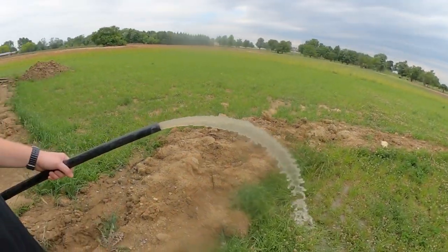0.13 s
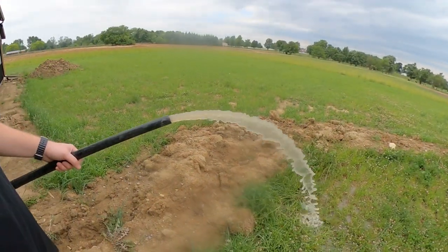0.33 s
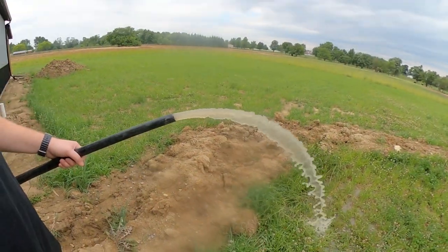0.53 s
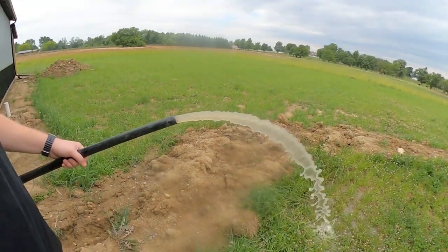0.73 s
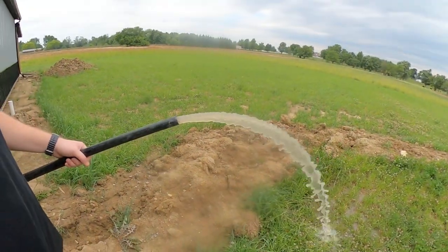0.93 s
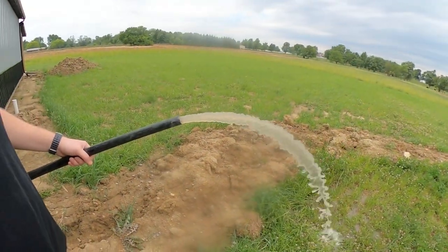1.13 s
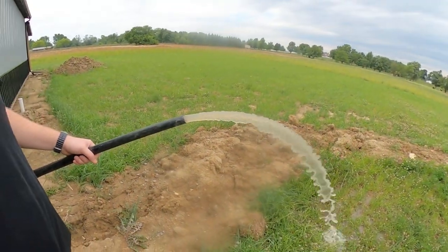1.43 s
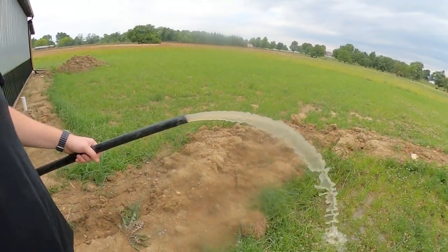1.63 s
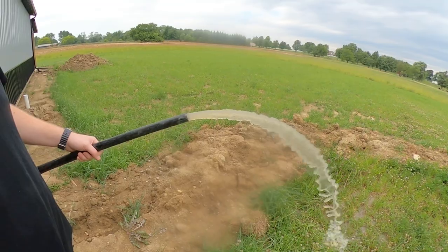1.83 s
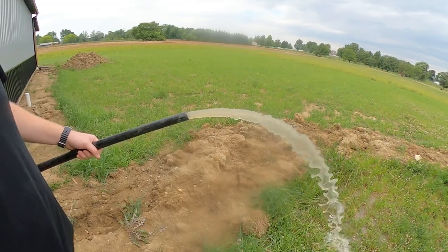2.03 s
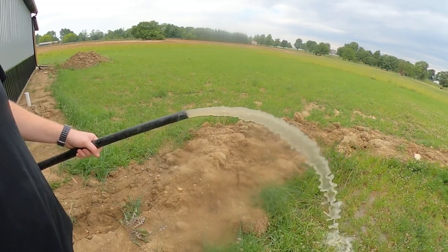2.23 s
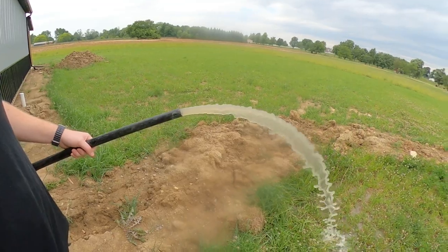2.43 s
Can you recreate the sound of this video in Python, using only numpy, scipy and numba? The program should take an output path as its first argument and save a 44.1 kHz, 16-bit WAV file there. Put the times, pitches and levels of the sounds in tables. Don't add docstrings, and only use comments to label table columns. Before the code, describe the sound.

Water pours steadily onto grass and soil for about 2.6 seconds, already running at the start and never stopping: rapid irregular slaps, short bubbly plops, crisp spray hiss. It sounds fuller around 0.5-0.9 s, thinner after 1.4 s. Low wind thumps hit the close outdoor microphone from 0.35 to 1.2 s, hardest and ragged near 0.82 s, uneven left and right; then nearly mono, with a faint gust around 2.25 s.

```python
import sys
import numpy as np
from scipy import signal
from scipy.fft import rfft, irfft
from scipy.io import wavfile
from scipy.ndimage import uniform_filter1d
from numba import njit

SR = 44100
rng = np.random.default_rng(int(sys.argv[2]) if len(sys.argv) > 2 else 0)


def voltage_ratio(level):
    return 10 ** (np.asarray(level, float) / 20)


def store_wav(level_fs):
    pcm = np.round(np.clip(np.atleast_2d(level_fs), -1, 1) * 32767)
    wavfile.write(sys.argv[1], SR, pcm.T.astype(np.int16))


N = 114660


def level(x, db):
    return x * voltage_ratio(db) / np.sqrt(np.mean(x ** 2))


def curve(table, axis):
    rows = np.array(table)
    return np.interp(np.arange(N) / SR, rows[:, 0], rows[:, axis])


def along(table, hz):
    rows = np.array(table)
    return np.interp(np.log(np.maximum(hz, 1)), np.log(rows[:, 0]), rows[:, 1])


def colour(x, db_at):
    return irfft(rfft(x) * voltage_ratio(db_at(np.fft.rfftfreq(N, 1 / SR))), N)


def band(x, lo_hz, hi_hz):
    return signal.sosfilt(signal.butter(2, [lo_hz, hi_hz], "band", fs=SR, output="sos"), x)


def tilt(x, hz, slope):
    return colour(x, lambda f: -10 * np.log10(1 + (np.maximum(f, 1) / hz) ** slope))


def steady(x, span_s):
    k = int(span_s * SR)
    power = uniform_filter1d(uniform_filter1d(x ** 2, k), k)
    return x / np.sqrt(power + 1e-18)


def walk(rate):
    k = int(SR / rate)
    steps = np.repeat(rng.standard_normal(N // k + 1), k)
    return 1.42 * uniform_filter1d(uniform_filter1d(steps, k), k)[:N]


def flicker(rate):
    w = walk(rate)
    return w - uniform_filter1d(w, int(.12 * SR))


@njit
def grains(n, start, pole, glide, size, length):
    y = np.zeros(n)
    for k in range(len(start)):
        z, p = size[k] + 0j, pole[k]
        for i in range(start[k], min(n, start[k] + length[k])):
            y[i] += z.imag
            z *= p
            p *= glide[k]
    return y


def rings(at_s, hz, cycles, size, rise):
    length = cycles * SR / hz
    turn = 2j * np.pi * hz / SR
    pole = np.exp(turn - np.log(1000) / length)
    glide = np.exp(turn * rise / length)
    return grains(N, (at_s * SR).astype(np.int64), pole, glide, size, length.astype(np.int64))


def bursts(at_s, size, t60_s, attack_s):
    spikes = np.zeros(N)
    np.add.at(spikes, np.clip((at_s * SR).astype(int), 0, N - 1), size ** 2)
    fall = np.exp(-2 * np.log(1000) / (t60_s * SR))
    rise = np.exp(-1 / (attack_s * SR))
    dying = signal.lfilter([1], [1, -fall], spikes)
    return np.sqrt(np.abs(signal.lfilter([1 - rise], [1, -rise], dying)))


def landing(slaps):
    lumps_per_s, spread_db, lull_lead_s, lull_share = 55, 6.5, 0.0128, 0.46
    chance = rng.random((int(lumps_per_s * N / SR), 2))
    at_s = (np.arange(len(chance)) + 1.13 * chance[:, 0]) / lumps_per_s
    small = level(bursts(at_s, voltage_ratio(spread_db * chance[:, 1]), 0.035, 0.0038), 0)
    big = bursts(slaps[:, 0], voltage_ratio(slaps[:, 1] + 40), 0.045, 0.0018)
    gap = bursts(slaps[:, 0], np.ones(len(slaps)), 0.025, 0.0013)
    gap = np.clip(np.roll(gap, -int(lull_lead_s * SR)), 0, 1)
    lull = 1 - lull_share * gap * np.clip(1 - 3 * big, 0, 1)
    return 0.69 * small * lull + 0.58 * big, big, lull


def bubbles(per_s, lo_hz, span, cycles, spread_db, lumps):
    chance = rng.random((int(per_s * N / SR), 4))
    hz = lo_hz * span ** chance[:, 1]
    size = voltage_ratio(-spread_db * np.log(chance[:, 2] + 0.054)) * np.sqrt(hz)
    size = size * lumps[(chance[:, 0] * N).astype(int)]
    return level(rings(chance[:, 0] * N / SR, hz, cycles * (1 + 2.1 * chance[:, 3]), size, 0.071), 0)


def fine_spray(lumps):
    surge_db, surges_per_s = 1.3, 40
    mist = np.zeros(N)
    for hz in 400 * 2 ** np.arange(6):
        octave = colour(rng.standard_normal(N), lambda f: -9 * np.log2((f + 1) / hz) ** 2)
        mist += octave * voltage_ratio(1.8 * flicker(25))
    drops = bubbles(1500, 1334, 13.2, 54, 3, lumps + .5)
    return voltage_ratio(surge_db * flicker(surges_per_s)) * (voltage_ratio(2) * mist + voltage_ratio(-2) * drops)


def slap_noise(lumps, big):
    hit = voltage_ratio(-2) * lumps + voltage_ratio(-3) * big
    dull = tilt(hit * rng.standard_normal(N), 1230, 4.9)
    return dull + voltage_ratio(-7.5) * hit * rng.standard_normal(N)


def splash_db(hz):
    # (frequency [Hz], level [dB])
    broad = [(200, -9.5), (380, -10), (600, -5.5), (1500, -3), (4500, -3), (8000, -16), (12500, -33.5),
             (15500, -39.5)]
    # (frequency [Hz], width [Hz], level [dB])
    puddle = [(536, 330, -0.5), (694, 37, 3.5), (834, 61, 7.5), (1006, 300, -1.5), (1230, 107, 4.5),
              (1500, 89, 2.5), (2110, 75, -2.5), (2360, 21, 3), (3034, 65, 4.5), (3460, 390, -0.5),
              (4930, 91, 1.5), (6060, 67, 4), (8660, 510, 0), (12200, 1700, 3)]
    return along(broad, hz) + sum(db * np.exp(-2 * ((hz - f) / w) ** 2) for f, w, db in puddle)


def fling_envelope():
    # (time [s], level [dB])
    thrown = np.array([
        (0.853, 5.5),
        (1.218, 3),
        (2.307, -5),
        (.178, 1),
        (0.39, -11),
        (.455, 6),
        (0.544, 5),
        (.575, -18),
        (1.028, -25),
    ])
    return bursts(thrown[:, 0], voltage_ratio(thrown[:, 1]), 0.076, 0.00083)


def slap_rings(slaps):
    cycles = np.full(len(slaps), 20.5)
    ring = rings(slaps[:, 0] + 0.00163, slaps[:, 2], cycles, voltage_ratio(slaps[:, 1] - 5.5), 0.021)
    return band(ring, 440, 2850)


def soil_thud(lumps):
    hz, width_hz = 170.5, 84
    thud = band(rng.standard_normal(N) * (lumps + 0.36), hz - width_hz / 2, hz + width_hz / 2)
    return level(band(thud, hz / 1.94, hz * 2.0), -56)


def water():
    # (time [s], peak [dB], ring [Hz])
    main_slaps = [(0.035, -27.5, 750), (0.054, -39, 1150), (0.067, -28.5, 1230), (0.095, -24.5, 1220),
                  (0.123, -34, 720), (0.177, -38, 790), (0.202, -28, 820), (0.23, -31, 1670),
                  (0.244, -33, 820), (0.263, -32.5, 799), (0.281, -31.5, 1000), (0.382, -24.5, 1760),
                  (0.415, -30.5, 1100), (0.439, -22.5, 1230), (0.493, -30.5, 1100), (0.517, -24.5, 1150),
                  (0.569, -27, 810), (0.599, -42, 830), (0.618, -26, 830), (0.796, -39, 680),
                  (0.885, -41, 860), (0.908, -26, 840), (0.938, -28, 821), (1.018, -29.5, 810),
                  (1.054, -31, 815), (1.105, -36, 696), (1.129, -30, 860), (1.156, -34.5, 1440),
                  (1.171, -26.5, 1460), (1.231, -29, 1500), (1.311, -32.5, 826), (1.349, -30.5, 1470),
                  (1.462, -28.5, 1540), (1.495, -29.5, 1560), (1.527, -33.5, 1920), (1.575, -28.5, 834),
                  (1.634, -27.5, 1470), (1.679, -33, 845), (1.713, -28.5, 791), (1.772, -33, 861),
                  (1.817, -26.5, 1480), (1.838, -38, 850), (1.863, -34, 1770), (1.911, -41, 1510),
                  (1.967, -28, 1610), (2.002, -39, 830), (2.017, -27.5, 1380), (2.045, -27.5, 830),
                  (2.1, -30, 1470), (2.203, -39.5, 826), (2.228, -32, 726), (2.261, -30, 810),
                  (2.304, -30.5, 1450), (2.355, -30.5, 820), (2.424, -40, 1130), (2.446, -24, 1480),
                  (2.493, -29, 1340), (2.53, -27.5, 1090)]
    # (time [s], peak [dB], ring [Hz])
    more_slaps = [(0.456, -28, 590), (0.474, -30, 807), (0.636, -32, 818), (0.682, -30.5, 800),
                  (0.707, -34, 695), (0.952, -31.5, 681), (1.752, -37, 850), (1.792, -32, 1380),
                  (2.059, -29, 970), (2.369, -32, 845), (2.548, -42, 1600), (2.549, -28.5, 844)]
    # (time [s], flow [dB], body as it lands on soil [dB], sparkle as the camera turns [dB])
    flow = [
        (0, -47, 4, 5.5),
        (.3, -48, 4, 9),
        (.55, -49, 8, 9),
        (.85, -47.5, 2.5, 6),
        (1.0, -48, 3, 4.5),
        (1.4, -46, -4, 1.5),
        (1.7, -45.5, -4, 4),
        (2.2, -46, -2.5, 6),
        (2.6, -44, -6, 5),
    ]
    slaps = np.concatenate([np.array(main_slaps), np.array(more_slaps)])
    lumps, big, lull = landing(slaps)
    fine = lull * fine_spray(lumps)
    spatter = voltage_ratio(-4.5) * bubbles(780, 5880, 3.8, 6.6, 2.4, lumps + 0.11)
    plops = voltage_ratio(-3) * bubbles(420, 483.6, 4.83, 9.5, 2, lumps + 0.54)
    splash = colour(fine + spatter + slap_noise(lumps, big) + plops, splash_db)
    splash = splash / np.std(band(splash, 2000, 6000))
    body = tilt(splash, 1120, 2.96)
    bright = splash - body
    splash = steady(bright, 0.064) * np.std(bright)
    splash = splash + voltage_ratio(curve(flow, axis=2)) * steady(body, 0.12) * np.std(body)
    splash = splash + tilt(splash, 6200, -1) * fling_envelope()
    sparkle = voltage_ratio(curve(flow, axis=3) / 3) - 1
    for hz in (7500, 10000, 11500):
        splash = splash + sparkle * tilt(splash, hz, -6)
    return splash * voltage_ratio(curve(flow, axis=1)) + slap_rings(slaps) + soil_thud(lumps)


def wind():
    # (time [s], level [dB], sharpness [dB])
    gusts = [(0, -53.5, -6), (.28, -51, -21.5), (.42, -32.5, -30.5), (.55, -43.5, -18.5), (.65, -34, -18),
             (.77, -43.5, -6), (.83, -34.5, -18), (.88, -40.5, -1), (.94, -31, -14), (1.05, -39.5, -13),
             (1.12, -40.5, -19.5), (1.27, -44, -12), (1.47, -43.5, -48), (1.56, -58, -11.5),
             (1.9, -62, -18), (2.2, -48.5, -13), (2.27, -41.5, -13), (2.6, -55.5, -37)]
    # (frequency [Hz], level [dB])
    rumble = [(15, -7.5), (38, 1), (65, -12.5), (110, -10.5), (170, -15), (260, -25.5), (400, -36.5),
              (1200, -110)]
    # (frequency [Hz], correlation [0-1])
    likeness = [(25, .9), (60, .65), (125, .5), (250, .3), (600, .1)]
    deep_parts, sharp_parts = [], []
    for sign in (1, -1):
        def port_db(f):
            alike = np.clip(along(likeness, f), 0, .99)
            return along(rumble, f) + 10 * np.log10((1 + sign * alike) / 2)
        x = colour(rng.standard_normal(N), port_db)
        deep = tilt_deep = colour(x, lambda f: -10 * np.log10(1 + (f / 110) ** 4))
        deep_parts.append(steady(deep, 0.02) * np.std(deep) * voltage_ratio(0.89 * walk(12.4)))
        sharp_parts.append((x - deep) * voltage_ratio(8.6 * walk(35.3) + curve(gusts, axis=2) + 11.0))
    both = np.array(deep_parts) + np.array(sharp_parts)
    return both / np.std(deep_parts[0]) * voltage_ratio(curve(gusts, axis=1) + 3.0) + buffets()


def buffets():
    # (time [s], peak [dB], pitch [Hz], left-right share [-1 to 1])
    eddies = [(.34, -30.5, 30, 0), (.37, -28.5, 45, 0), (0.392, -29, 60.6, 0.11), (0.425, -21, 51, 0.38),
              (0.463, -22.5, 70.4, -0.62), (0.481, -28, 49.8, 0), (0.522, -30.5, 40.3, 0.074),
              (0.591, -23, 90, 0.39), (0.604, -28, 60, -0.12), (0.649, -20.5, 73, 0.16),
              (0.674, -25, 70, -0.26), (.75, -25.5, 60, 0.78), (0.803, -23, 79, -0.38),
              (0.8206, -12.5, 145.5, -0.74), (0.83, -18, 51.5, .4), (.852, -21.5, 54.7, 0.34),
              (0.872, -27, 60, -0.068), (0.903, -22.5, 39.8, 0.1), (0.926, -17.5, 50.6, 0.077),
              (0.95, -27, 75.4, -0.12), (.958, -26, 84, -0.18), (0.996, -25, 69, -0.31),
              (1.023, -33, 260, 0), (1.1, -25, 75, -0.039), (1.123, -27, 40, 0.15),
              (1.163, -33.5, 112, -0.074), (1.196, -27.5, 110, -0.0042), (1.206, -25.5, 108, -0.092),
              (2.234, -30, 121, 0), (2.261, -29, 45, 0), (2.292, -33, 59, 0), (2.33, -41, 45, 0)]
    rag_db, rag_above_db = -34.5, -20.5
    t, out = np.arange(N) / SR, np.zeros((2, N))
    rag = [level(band(band(rng.standard_normal(N), 280, 520), 220, 1000), rag_db) for _ in range(2)]
    rag = np.array(rag) * [[.6], [1]]
    for at, db, hz, share in eddies:
        u = (t - at) * hz
        mid = -np.cos(2 * np.pi * u - .4)
        side = share * np.sin(2.6 * np.pi * u + 0.18)
        out += voltage_ratio(db) * np.exp(-(u / 0.48) ** 2) * np.array([mid, side])
        out += voltage_ratio(2 * db - rag_above_db) * np.exp(-((t - at - .006) / 0.013) ** 2) * rag
    return out


def far_rumble():
    return level(band(rng.standard_normal(N) * (1 + np.arange(N) / SR), 26, 47), -60.5)


def treble_width(jet):
    centre_hz, widest_s = 8100, 0.65
    lo_hz, hi_hz = centre_hz / 1.3, centre_hz * 1.3
    wide = level(band(band(np.roll(jet, 400), lo_hz, hi_hz), lo_hz, hi_hz), -60.5)
    return tilt(wide, 6300, -30) * (0.044 + np.exp(-((np.arange(N) / SR - widest_s) / 0.28) ** 2))


def scene():
    mono_from_s, mono_fade_s = 1.398, 0.055
    t = np.arange(N) / SR
    jet = water()
    wind_mid, wind_side = wind()
    mid = jet + wind_mid + far_rumble()
    side = wind_side + treble_width(jet) + voltage_ratio(-33) * np.roll(jet, 300) * (t < .75)
    side = side * np.clip((mono_from_s - t) / mono_fade_s, .003, 1)
    return np.array([mid + side, mid - side])


def top_cut(x):
    return signal.sosfilt(signal.butter(12, 15720, fs=SR, output="sos"), x)


def record(dry):
    # (time [s], frequency [Hz])
    top = [(0, 15900), (.4, 15700), (.55, 15200), (.9, 14800), (.97, 13900), (1.45, 14500), (1.7, 15900),
           (2.6, 15900)]
    f, t, z = signal.stft(dry, SR, nperseg=2048)
    ragged = np.repeat(rng.standard_normal(len(t)), repeats=3)[:len(t)]
    edge = np.interp(t, *np.array(top).T) - 450 * np.abs(ragged)
    kept = signal.istft(z * (f[:, None] < edge), SR, nperseg=2048)[1][:, :N]
    return top_cut(kept)


dry = scene()
out = record(dry)
store_wav(out)
```